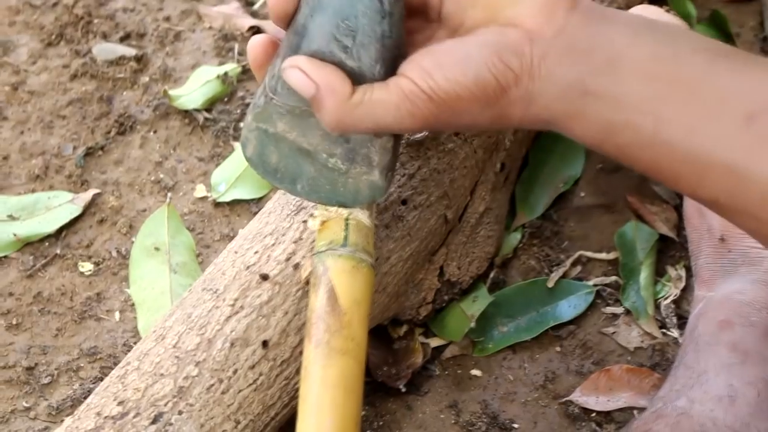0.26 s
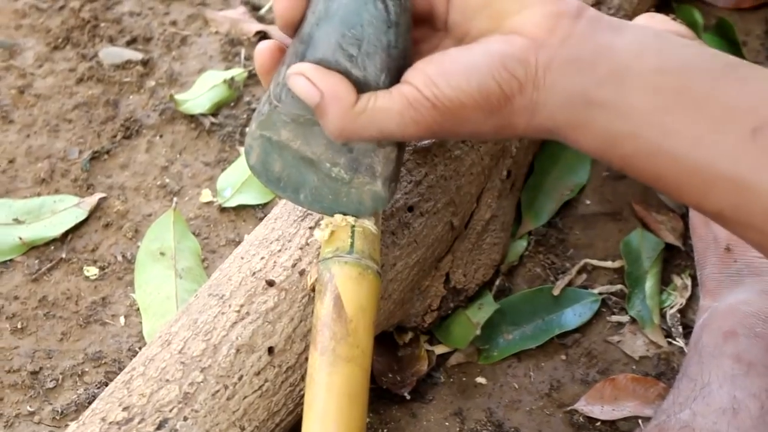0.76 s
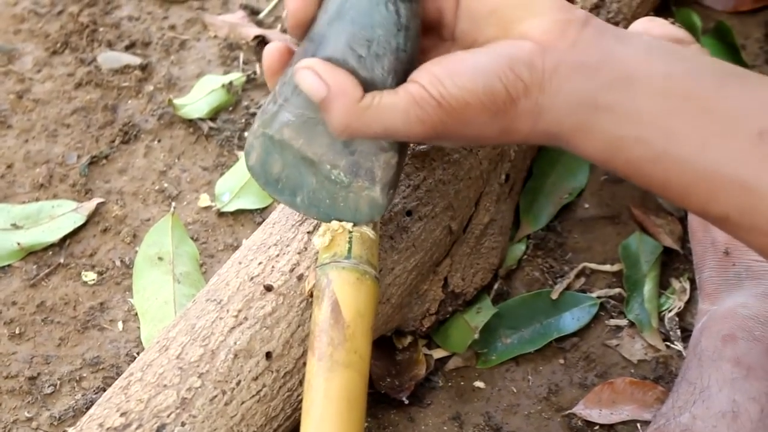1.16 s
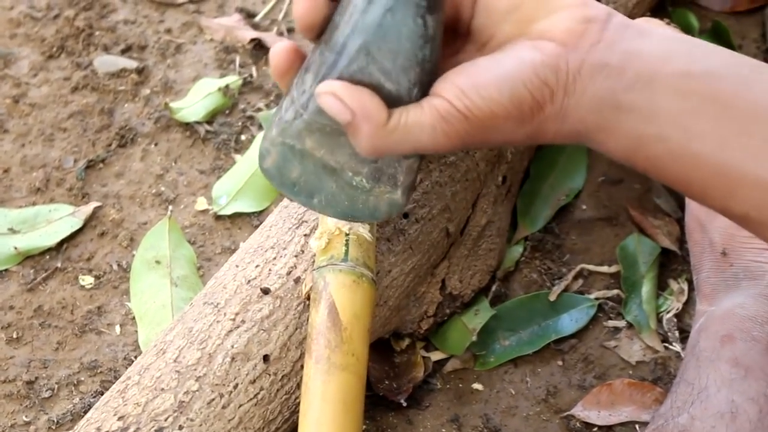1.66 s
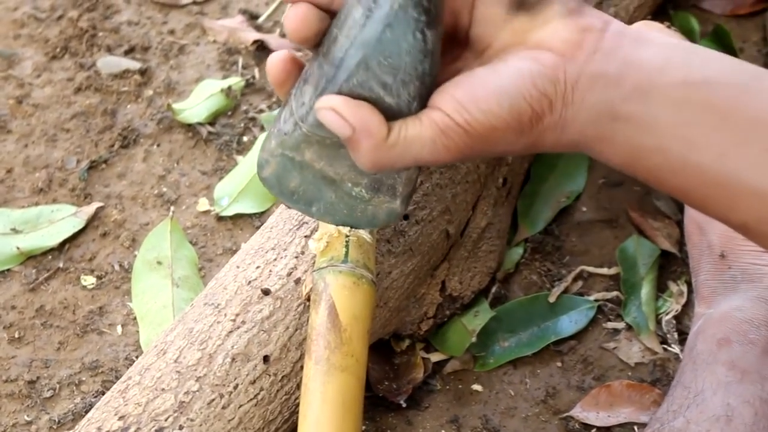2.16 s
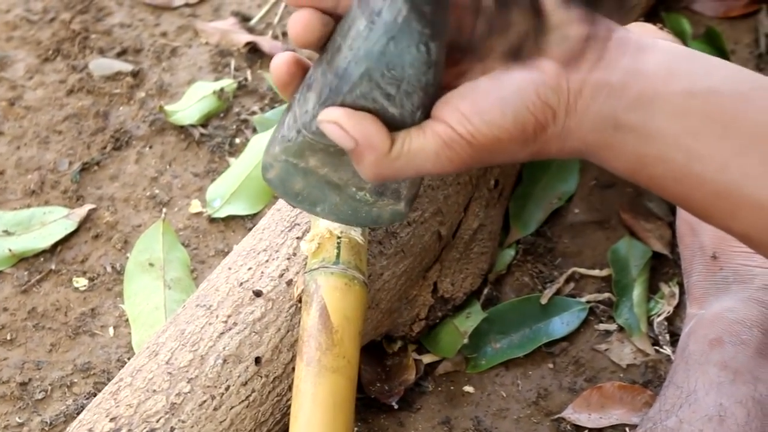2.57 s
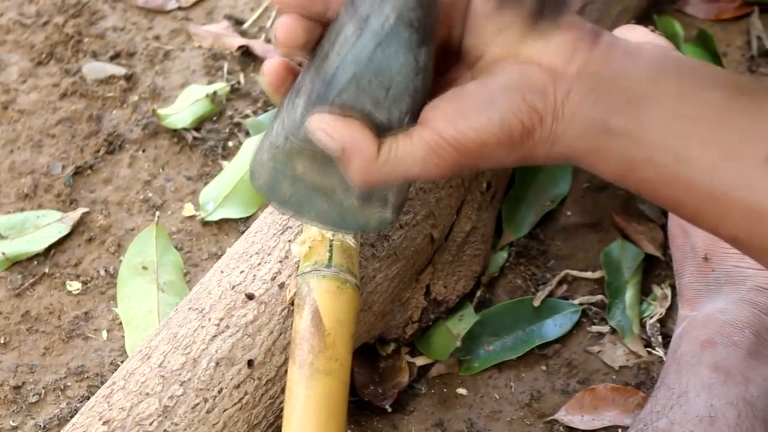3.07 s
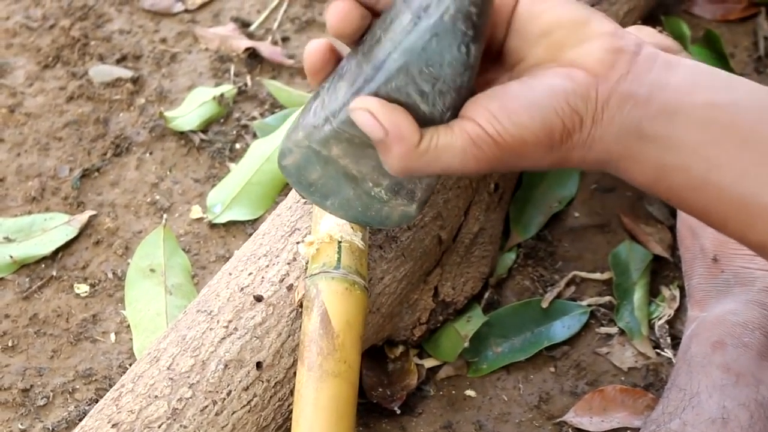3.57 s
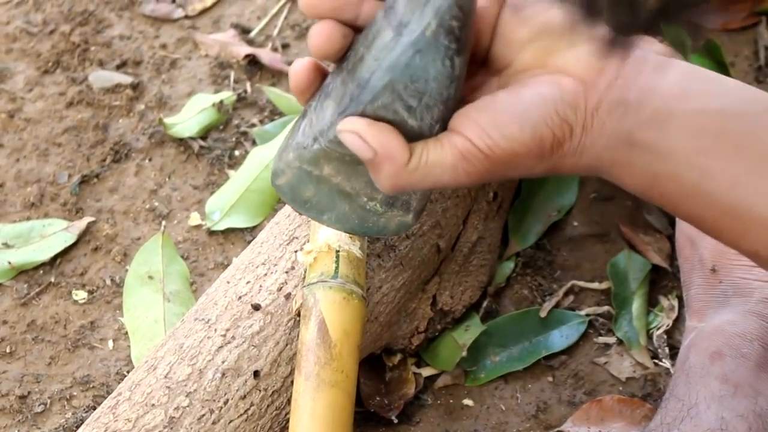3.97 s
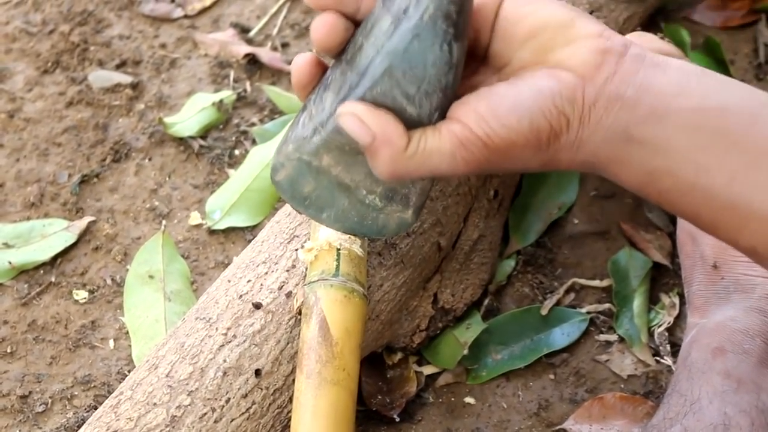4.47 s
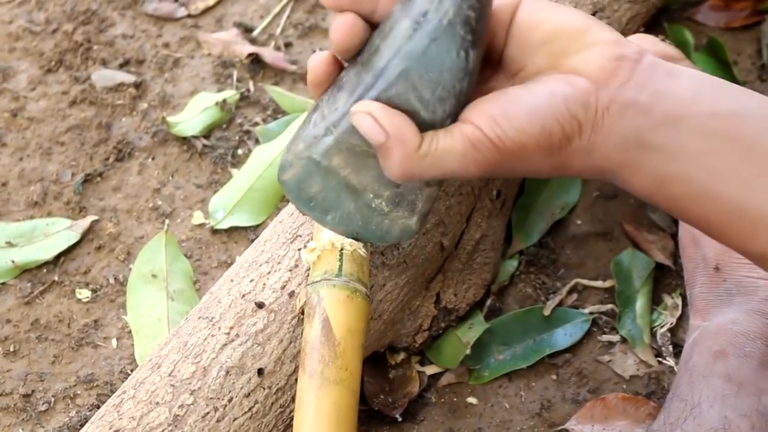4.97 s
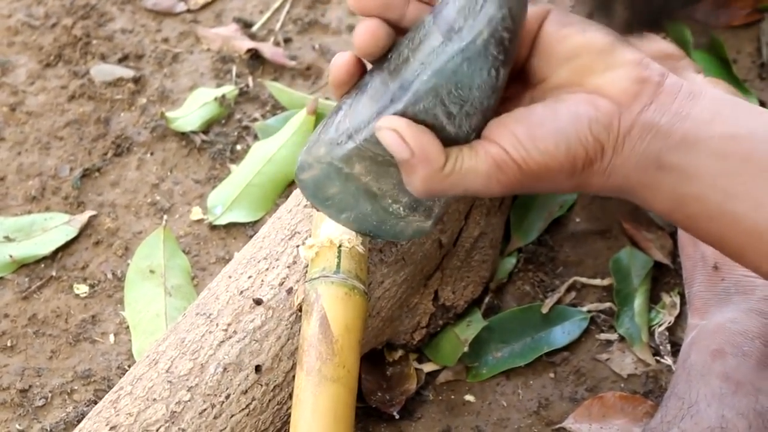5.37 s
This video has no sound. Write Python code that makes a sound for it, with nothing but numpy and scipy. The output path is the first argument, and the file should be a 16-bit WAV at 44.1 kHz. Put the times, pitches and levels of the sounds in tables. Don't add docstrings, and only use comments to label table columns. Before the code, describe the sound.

Sharp woody strikes of a stone on cane and log, irregularly spaced, with brief scrapes and splintering, amid faint woodland insects.

```python
import sys
import numpy as np
from scipy import signal
from scipy.fft import rfft, irfft, next_fast_len
from scipy.io import wavfile
from scipy.ndimage import uniform_filter1d

SR = 44100
rng = np.random.default_rng(int(sys.argv[2]) if len(sys.argv) > 2 else 0)


def generate_wav(signal):
    frames = np.transpose(np.atleast_2d(signal))
    scaled = np.clip(frames, -1, 1) * 32767
    pcm = np.round(scaled).astype(np.int16)
    wavfile.write(sys.argv[1], SR, pcm)


def voltage_ratio(decibels):
    exponent = np.asarray(decibels, float) / 20
    return 10 ** exponent


N = 247401
T = np.arange(N) / SR

# frequency_hz, density_db_per_hz
AIR_SPECTRUM = [(42, 3), (75, 0), (130, -2.5), (300, -9), (600, -10), (1000, -12.5), (2000, -17.5),
                (4000, -18), (5000, -16.5), (7300, -25.5), (8200, -23.5), (13000, -28), (15600, -33),
                (16000, -67)]
# frequency_hz, correlation
AIR_LIKENESS = [(60, 0.84), (150, 0.88), (380, 0.63), (950, 0.56), (2380, 0.26), (5980, -0.015),
                (15000, -0.038)]
# frequency_hz, left_over_right_db
AIR_BALANCE = [(60, 2.5), (180, 1.5), (550, 0.5), (1650, 0.0), (4970, 0.5), (15000, 1.5)]
AIR_DB = -51.5
# frequency_hz, density_db_per_hz
CICADA_SPECTRUM = [(4900, -30.5), (5250, -7.5), (5600, -0.5), (5870, 2), (6200, -2.5), (6600, -10),
                   (7000, -22)]
CICADA_DB = -49
# start_s, length_s, level_db
CRICKET_BOUTS = [
    (-.3, 0.62, -66.5),
    (.3, 1.5, -79.5),
    (1.9, 0.33, -72),
    (2.3, 1.19, -70),
    (3.6, 0.42, -68.5),
    (4.2, 0.69, -71),
    (4.9, 1.04, -77.5),
]
# start_s, length_s, level_db, click_rate_per_s
FROG_BOUTS = [
    (-.3, .8, -67, 37),
    (.5, 0.3, -73, 46),
    (1.05, 0.85, -61.5, 32),
    (1.851, 1.08, -60, 41.6),
    (2.954, 1.4, -53.5, 33.5),
    (4.4, 0.41, -59, 34),
    (4.796, 0.74, -57, 33.5),
]
HUM_HZ, HUM_WIDTH_HZ, HUM_DB = 764, 43, -69
BOUT_EDGE_S = .2
# start_s, length_s, level_db, top_pitch_hz, place_of_top (0-1)
BIRD_NOTES = [
    (1.66, .25, -61, 1145, .68),
    (4.76, .25, -58, 1200, .32),
    (4.93, .11, -65, 1215, .2),
    (5.09, .13, -67, 1340, .7),
]
BIRD_RISE_HZ_PER_S2, BIRD_FALL_HZ_PER_S2 = 8000, 14000
BIRD_FADE_DB_PER_HZ = .04

# time_s, level_db, centre_hz, edge_db
LEAF_DRAG = [
    (.045, -64, 7200, -4),
    (.065, -50, 6800, -3),
    (.088, -44, 5900, -6),
    (.096, -43, 4300, 3),
    (.127, -40, 4400, 5),
    (.14, -43, 4400, -2),
    (.18, -45, 4450, -6),
    (.215, -50, 4500, -9),
    (.235, -61, 4500, -9),
]
# time_s, level_db, length_s
LITTER_RUSTLES = [
    (0.805, -55, 0.034),
    (1.25, -54, 0.038),
    (1.52, -53, 0.017),
    (1.759, -55.5, 0.071),
    (3.698, -56.5, 0.056),
    (5.236, -54, 0.035),
]
# centre_hz, width_hz, level_db
LITTER_BANDS = [(1800, 1100, -16), (4400, 4700, 14), (7600, 2500, -20)]

# start_s, length_s, level_db, upper_modes_db, place_of_crest (0-1)
STONE_TOUCHES = [
    (.216, 0.043, -34, -5, 0.4),
    (.655, 0.026, -55.5, 17, 0.75),
    (1.06, 0.023, -69, 18.5, .4),
    (3.117, 0.042, -32.5, -8.5, 0.31),
    (4.776, 0.022, -59.5, 8.5, 0.66),
]
# start_s, length_s, level_db, upper_modes_db, place_of_crest (0-1)
STONE_SLIDES = [
    (2.68, 0.106, -39.5, -2, 1),
    (3.79, 0.089, -49.5, -1, 0.42),
    (4.21, 0.073, -44.5, 1, .95),
    (4.605, 0.067, -36.5, -5.5, 1),
    (5.51, 0.091, -52.5, 4, 0.66),
]
# centre_hz, width_hz, level_db
RUBBED_UPPER_MODES = [(2060, 380, 3.5), (3380, 1000, -2), (4840, 4300, -1.5), (10100, 9600, -12)]
RUB_HZ, TOUCH_GLIDE_HZ, SLIDE_GLIDE_HZ = 1030, 330, 40
TOUCH_WIDTH_HZ, SLIDE_WIDTH_HZ = 130, 330
RUB_RISE_DB, RUB_FALL_DB = 24, 22

# swing_db, murmur_db, murmur_fade_db_per_s, grit_db
SETTLE_LEVELS = [(-21, -25, 294, -45), (-33, -27.5, 252, -44.5), (-16, -28, 235, -44.5),
                 (-31, -30, 303, -52), (-22, -34.5, 215, -45.5), (-27, -25, 291, -42),
                 (-19.5, -33, 242, -47), (-15, -28.5, 240, -44.5), (-14.5, -29.5, 232, -42.5)]
# centre_hz, width_hz, level_db
SETTLE_MODES = [(75, 27, 6), (263, 140, 4.5), (476, 214, 7), (757, 285, 2), (1010, 540, 6.5),
                (1430, 830, -10)]
# centre_hz, width_hz, level_db
GRIT_BANDS = [(2010, 2460, 2), (3670, 3500, -2.5), (7900, 5400, -10)]
SETTLE_AFTER_S, SETTLE_S, SWING_DB_PER_S = .007, .15, 1500
GRIT_DB_PER_S, GRIT_RISE_S = 100, .012
# time_s, level_db
CANE_REBOUNDS = [
    (0.736, -36),
    (3.227, -32.5),
]
REBOUND_S = 0.0049

# snap_db, snap_tilt_db_per_octave, splinters_db, splinter_decay_ms, rattle_db
BLOW_BREAKS = [(-10.5, 9.5, -27, 3.4, -17), (-10.5, 8.5, -11, 1.07, -15.5), (-7, 10, -30, 1.6, -16.5),
               (-17.5, 4, -19, 1.85, -23), (-41, -14, -22, 3.4, -29), (-20, -5, -14, 2.6, -23.5),
               (-15.5, -5, -14.5, 1.57, -30.5), (-17, -6, -13, 2.2, -19.5), (-20, 2, -16.5, 4.1, -21),
               (-19, 3, -15.5, 2.2, -22.5)]
# centre_hz, width_hz, level_db
SPLIT_END_MODES = [(790, 280, -3), (1399, 260, 0), (1960, 200, -6), (3070, 440, -19.5)]
# frequency_hz, density_db_per_hz
CRACK_SPECTRUM = [(1290, -43.5), (2200, -7.5), (2650, -16.5), (3110, -5), (3870, -11), (7150, -5.5),
                  (8330, -23), (9450, -12.5), (13900, -27), (15800, -29), (16500, -48)]
SNAP_MS, SPLINTER_TILT_DB, BEND_S = 0.57, -5, .0017

# time_s, strength_db, cane_ring_db, upper_ring_db, delay_until_cane_meets_log_ms
STONE_BLOWS = [
    (.26599, 5.3, 2, -3, 3.32),
    (.68444, 4.4, 6, 1, 3.37),
    (1.09062, 2.9, 3, 5, 3.2),
    (1.94307, 2.6, 9, -5, 3.47),
    (2.77622, 2.6, 8, -12, 3.58),
    (3.15554, 5, 8, -10, 3.38),
    (3.87459, 2.3, 9.5, -12, 3.54),
    (4.2701, 3.8, 10.5, -10, 3.48),
    (4.67275, 4, 10, -8, 3.49),
    (5.6052, 3.8, 10, -10, 3.5),
]
# frequency_hz, damping_per_s, signed_size, share_struck_again, left_right_db
LOG_MODES = [(208, 716, .53, .45, 2.2), (445, 858, -1.04, .78, .8), (636, 805, -.43, -.48, .5),
             (906, 1080, -.46, -.36, 1.5), (105, 110, .03, .3, 2.5), (270, 210, .04, .4, 1.1),
             (530, 210, -.03, .4, .6), (715, 200, .02, .4, .6)]
# frequency_hz, damping_per_s, signed_size,
# share_struck_again, left_right_db
CANE_MODES = [(1150, 392, -.2, -.41, 2.2), (1020, 160, -.016, .4, 2.1), (1300, 250, -.006, .3, 2.1),
              (3100, 700, -.005, .4, 1.5), (4300, 800, -.008, .4, 2.5)]
# frequency_hz, damping_per_s, signed_size,
# share_struck_again, left_right_db
CANE_UPPER_MODES = [(1560, 600, -.2, .1, 1.1), (2040, 450, .08, .3, 1.1), (2900, 600, -.06, .5, 1.5),
                    (1010, 300, -.06, .6, 1.5), (1290, 330, -.04, .4, 1.5)]
SOFT_PITCH, PITCH_PER_DB, PITCH_PER_CANE_DB = .985, .012, -.003


def evened(x):
    return x / np.sqrt(np.mean(x ** 2) + 1e-20)


def read(points, hz):
    f, value = np.transpose(points)
    return np.interp(np.log(hz + 1), np.log(f + 1), value)


def add(mix, s, sound):
    part = mix[:, round(s * SR):][:, :sound.shape[1]]
    part += sound[:, :part.shape[1]]


def resonate(x, hz, width):
    turn = np.exp(2j * np.pi * np.cumsum(hz * np.ones(x.shape[-1])) / SR)
    r = np.exp(-np.pi * width / SR)
    smooth = signal.lfilter([(1 - r) ** 2], [1, -2 * r, r * r], x / turn + 1e-18)
    return 2 * (turn * smooth).real


def body(x, modes):
    return evened(sum(voltage_ratio(db) * evened(resonate(x, hz, width)) for hz, width, db in modes))


def pair(length, same, lean_db, rough_db=0.):
    a, b, lumps = rng.standard_normal((length, 3)).T
    lumps = voltage_ratio(rough_db * evened(uniform_filter1d(lumps, 90)))
    same = np.clip(same, -1, 1)
    noises = np.array([a, same * a + np.sqrt(1 - same ** 2) * b])
    return noises * lumps * voltage_ratio([[lean_db / 2], [-lean_db / 2]])


def air():
    frames, hz = N // 256 + 5, np.fft.rfftfreq(1024, 1 / SR)
    a, b, c, d, patches = rng.standard_normal((frames, 513, 5)).T
    patches = evened(uniform_filter1d(uniform_filter1d(patches, 12, 0), 12, 1))
    flicker = evened(uniform_filter1d(rng.standard_normal(frames), 8))
    same = np.clip(read(AIR_LIKENESS, hz), -1, 1)[:, None]
    left = a + 1j * b
    z = np.array([left, same * left + np.sqrt(1 - same ** 2) * (c + 1j * d)])
    lean_db = read(AIR_BALANCE, hz)[:, None] * np.array([.5, -.5])[:, None, None]
    z *= voltage_ratio(read(AIR_SPECTRUM, hz)[:, None] + lean_db + 1.34 * patches + 0.51 * flicker)
    return voltage_ratio(AIR_DB) * evened(signal.istft(z, nperseg=1024, noverlap=768)[1][:, :N])


def cicadas():
    size = next_fast_len(N)
    hz = np.fft.rfftfreq(size, 1 / SR)
    colour = voltage_ratio(read([(0, -90), *CICADA_SPECTRUM, (7400, -90)], hz))
    noise = pair(size, -0.24, 1.8, rough_db=0.5)
    return voltage_ratio(CICADA_DB + 3.5) * evened(irfft(rfft(noise) * colour, size)[:, :N])


def bouts(rows):
    gain = sum(voltage_ratio(db) * ((T > s) & (T < s + length)) for s, length, db, *_ in rows)
    return uniform_filter1d(gain, size=round(BOUT_EDGE_S * SR))


def cricket():
    beat = (T * 22.5 + .3 + .25 * np.sin(2 * np.pi * 1.3 * T)) % 1
    syllable = .45 + np.sin(np.pi * np.minimum(beat / .8, 1)) ** 2
    groups = (1.1 + .27 * np.cos(2 * np.pi * 3.8 * (T - 2.36))) ** 2
    wing = evened(resonate(pair(N, 0., 1.9), 4620 - 800 * beat, 370) * syllable * groups)
    return bouts(CRICKET_BOUTS) * voltage_ratio(10.5) * wing


def frog():
    s, length, _, rate = np.transpose(FROG_BOUTS)
    phase = np.cumsum(np.interp(T, s + length / 2, rate)) / SR
    clicks = np.diff(np.floor(phase + .6), prepend=0)
    purr = evened(resonate(clicks, 467, 97)) * bouts(FROG_BOUTS) * voltage_ratio(-6.5)
    return purr + voltage_ratio(HUM_DB) * evened(resonate(pair(N, 1.0, .4), HUM_HZ, HUM_WIDTH_HZ))


def bird(s, length, level_db, top_hz, place):
    t = np.arange(round(length * SR)) / SR
    from_top = t - place * length
    falling = t > place * length
    hz = top_hz - np.where(t < place * length, BIRD_RISE_HZ_PER_S2, BIRD_FALL_HZ_PER_S2) * from_top ** 2
    gain = signal.windows.tukey(len(t), .25) * voltage_ratio(level_db - BIRD_FADE_DB_PER_HZ * (top_hz - hz) * falling)
    tone = np.sqrt(2) * np.sin(2 * np.pi * np.cumsum(hz) / SR)
    blur = evened(resonate(pair(len(hz), .6, 0.), hz, 45))
    return s, gain * (.8 * tone + .5 * blur)


def rustle(s, level_db, length):
    count = max(round(2 * length * SR), 200)
    puff = pair(count, .4, 1.5, rough_db=1.5)
    return s - length, voltage_ratio(level_db) * body(puff, LITTER_BANDS) * np.hanning(count)


def leaf():
    s, *values = np.transpose(LEAF_DRAG)
    t = np.arange(s[0], s[-1], 1 / SR)
    level_db, hz, edge_db = (np.interp(t, s, v) for v in values)
    rub = pair(len(hz), -.3, 4.1, rough_db=2.5)
    hiss = signal.sosfilt(signal.butter(3, [4100, 6400], "band", fs=SR, output="sos"), rub)
    narrow = voltage_ratio(edge_db) * evened(resonate(rub, hz, 280))
    return s[0], signal.windows.tukey(len(t), .08) * voltage_ratio(level_db) * (narrow + evened(hiss))


def scrape(s, length, level_db, upper_db, crest, glide_hz, width):
    u, crest = np.linspace(0, 1, round(length * SR)), np.clip(crest, .05, .97)
    rise_db = RUB_RISE_DB * (1 - u / crest) ** 2
    fall_db = RUB_FALL_DB * (u - crest) ** 2 / (1 - crest)
    under_db = np.where(u < crest, rise_db, fall_db)
    hz = RUB_HZ + glide_hz * (np.minimum(u / crest, 1.2) - .7)
    rub = pair(len(hz), 0.93, 1.7, rough_db=2.5)
    ring = evened(resonate(rub, hz, width)) + voltage_ratio(upper_db) * body(rub, RUBBED_UPPER_MODES)
    return s, signal.windows.tukey(len(u), .08) * voltage_ratio(level_db - under_db) * ring


def rebound(s, level_db):
    count = round(3 * REBOUND_S * SR)
    knock = body(pair(count, .97, 1.1), SETTLE_MODES[1:3])
    return s - 1.5 * REBOUND_S, voltage_ratio(level_db) * knock * np.hanning(count)


def settle(s, swing_db, murmur_db, fade_db, grit_db):
    t = np.arange(round(SETTLE_S * SR)) / SR
    knocks = pair(len(t), 0.97, 1.12, rough_db=0.5)
    grit = pair(len(t), 0.29, 1.6, rough_db=-1.5)
    dying = np.minimum(np.linspace(3, 0, len(t)), 1) * np.minimum(t / .004, 1)
    rocking = voltage_ratio(swing_db - SWING_DB_PER_S * t) + voltage_ratio(murmur_db - fade_db * t)
    falling = voltage_ratio(grit_db - GRIT_DB_PER_S * t) * (1 - np.exp(-(t / GRIT_RISE_S) ** 2))
    return s + SETTLE_AFTER_S, dying * (rocking * body(knocks, SETTLE_MODES) + falling * body(grit, GRIT_BANDS))


def clatter(s, level_db):
    t = np.arange(1500) / SR
    swell = t / 0.0021 * np.exp(1 - t / 0.0022)
    rattle = evened(body(pair(1500, 0.99, 1.0), SPLIT_END_MODES) * swell)
    return s, voltage_ratio(level_db) * rattle * np.sqrt(np.mean(swell ** 2))


def crack(s, level_db, tilt_db, decay_ms):
    t, hz = np.arange(1024) / SR, np.fft.rfftfreq(1024, 1 / SR)
    colour = voltage_ratio(read(CRACK_SPECTRUM, hz) + tilt_db * np.log2(np.maximum(hz, 1) / 4000))
    noise = evened(irfft(rfft(pair(1024, 0.72, 2.6)) * colour))
    shape = (1 - np.exp(-t / .0001)) * (np.exp(-1000 * t / decay_ms) + .02 * np.exp(-t / .004))
    return s, voltage_ratio(level_db) * evened(noise * shape) * np.sqrt(np.mean(shape ** 2))


def blow(s, strength_db, cane_db, upper_db, delay_ms):
    t, out = np.arange(3000) / SR, np.zeros((2, 3000))
    again_t = np.maximum(t - delay_ms / 1000, 0)
    pitch = SOFT_PITCH + PITCH_PER_DB * strength_db + PITCH_PER_CANE_DB * cane_db
    for modes, db, samples in ((LOG_MODES, 0, 1.1), (CANE_MODES, cane_db, 2.6), (CANE_UPPER_MODES, upper_db, 1.6)):
        lag = np.array([[-.5], [.5]]) * samples / SR
        for hz, damping, size, again, lean_db in modes:
            gain = size * voltage_ratio([[db + lean_db / 2], [db - lean_db / 2]])
            for u, share in ((t, 1), (again_t, again)):
                swell = u * damping * np.exp(-u * damping)
                out += share * gain * swell * np.sin(2 * np.pi * hz * pitch * (u - lag))
    return s, voltage_ratio(strength_db) * out


def scene():
    mix = air() + cicadas() + cricket() + frog()
    for source, rows in ((bird, BIRD_NOTES), (rustle, LITTER_RUSTLES), (rebound, CANE_REBOUNDS)):
        for row in rows:
            add(mix, *source(*row))
    add(mix, *leaf())
    for row in STONE_TOUCHES:
        add(mix, *scrape(*row, TOUCH_GLIDE_HZ, TOUCH_WIDTH_HZ))
    for row in STONE_SLIDES:
        add(mix, *scrape(*row, SLIDE_GLIDE_HZ, SLIDE_WIDTH_HZ))
    for row, levels in zip(STONE_BLOWS, SETTLE_LEVELS):
        add(mix, *settle(row[0], *levels))
    for row, (snap_db, tilt_db, splinter_db, splinter_ms, rattle_db) in zip(STONE_BLOWS, BLOW_BREAKS):
        s = row[0]
        add(mix, *clatter(s, rattle_db))
        add(mix, *crack(s, snap_db, tilt_db, SNAP_MS))
        add(mix, *crack(s + BEND_S, splinter_db, SPLINTER_TILT_DB, splinter_ms))
        add(mix, *blow(*row))
    return mix


def top_cut(x):
    return signal.sosfilt(signal.butter(12, 16620, fs=SR, output="sos"), x)


def record(dry):
    dry = signal.lfilter(*signal.butter(2, 90, "high", fs=SR), dry)
    power_db = 10 * np.log10(abs(uniform_filter1d((dry ** 2).mean(0), 300, origin=149)) + 1e-12)
    recovery_db = T * 160.
    held_db = np.maximum.accumulate(power_db + recovery_db) - recovery_db
    over_db = np.maximum(held_db + 21.5, 0)
    late_db = np.concatenate([np.zeros(400), uniform_filter1d(over_db, 200)])[:N]
    ducked = dry / voltage_ratio(.18 * late_db) * np.minimum(T / .02, 1)
    ducked = signal.oaconvolve(ducked, signal.firwin(255, 16300, fs=SR)[None], "same")
    return top_cut(np.clip(ducked, -1, 1))


dry = scene()
out = record(dry)
generate_wav(out)
```